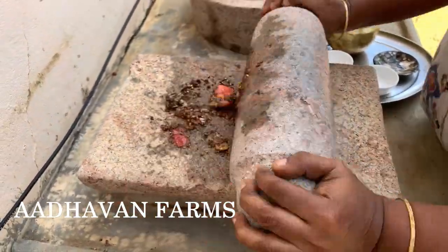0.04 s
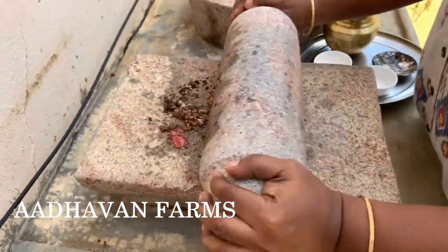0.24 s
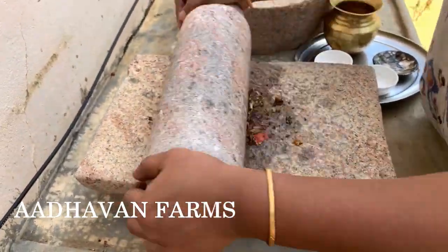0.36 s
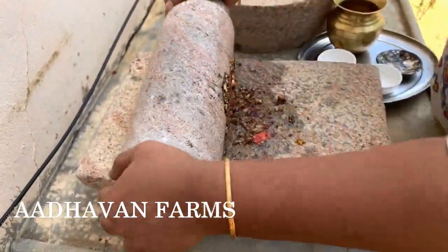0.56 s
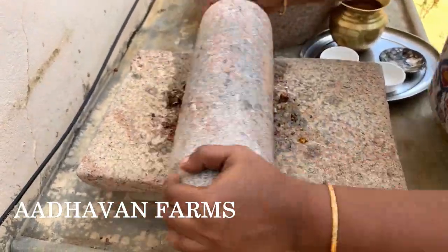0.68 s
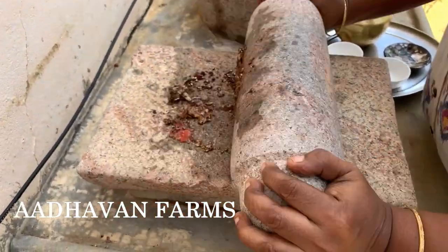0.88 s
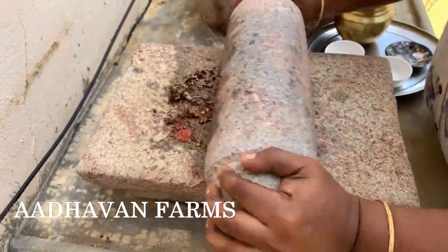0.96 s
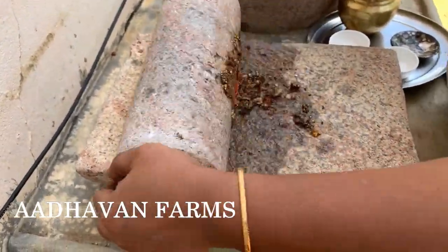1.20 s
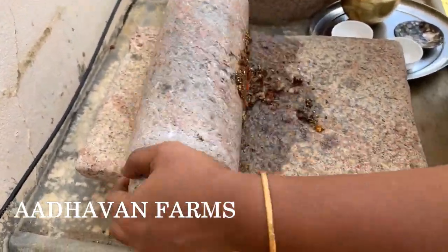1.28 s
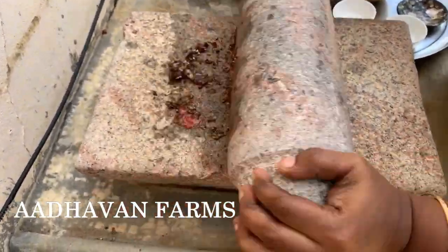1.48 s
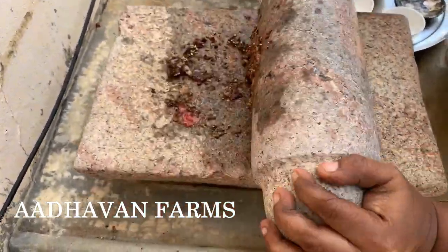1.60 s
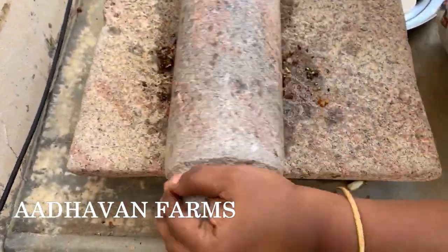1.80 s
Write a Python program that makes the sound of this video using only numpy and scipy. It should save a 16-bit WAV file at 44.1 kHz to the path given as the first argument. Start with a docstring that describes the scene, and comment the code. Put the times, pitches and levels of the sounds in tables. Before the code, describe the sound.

A heavy stone roller rasps to and fro over a stone slab, crushing gritty wet spices

```python
"""A stone roller is pushed to and fro over a stone slab, crushing wet spice paste, close to the ear.
Its strokes are coloured noise, dense with tiny clicks, that swells with the roller's speed.
Seeds burst as short noise flurries with a pitched snap; thin sine squeaks sink in pitch at the turns.
The roller knocks on the slab, twice loudly, as banks of decaying modes; nearby walls answer with noise tails.
A wavering sine hum and dull, wide yard noise lie underneath."""
import sys
import numpy as np
from scipy import signal
from scipy.fft import rfft, irfft
from scipy.io import wavfile

SR = 44100
rng = np.random.default_rng(int(sys.argv[2]) if len(sys.argv) > 2 else 0)


def transcribe(u):
    """Save the signal u as a 16-bit wav file named by the first command-line argument.

    u: samples, shape (n,) or (channels, n), limited to [-1, 1]; the rate is SR.
    q: integer samples, one column per channel.
    """
    v = np.clip(np.atleast_2d(u).T, -1, 1)
    q = np.round(v * 32767).astype(np.int16)
    wavfile.write(sys.argv[1], SR, q)


N = 81585
WALL_S = 0.012  # the walls stay silent this long before they answer

# colour of gritty crushing, for strokes and seeds: (frequency [Hz], relative level per Hz [dB])
GRIT_COLOUR = [(400, -18.5), (900, -20.5), (1550, -2), (2150, -5.5), (2950, 1), (3600, -4.5), (4600, -4.5),
               (7000, -28), (14000, -38)]


def undb(db):
    """Decibels to gain."""
    return 10 ** (np.asarray(db) / 20)


def unit(x):
    """Scale to rms 1."""
    return x / np.sqrt(np.mean(x ** 2))


def at(points, hz):
    """Read a table on a log-frequency axis."""
    table_hz, values = np.array(points, float).T
    return np.interp(np.log(np.maximum(hz, 1)), np.log(table_hz), values)


def colour(x, points):
    """Shape a spectrum, keeping the power of white noise."""
    gain = unit(undb(at(points, np.fft.rfftfreq(2 * N, 1 / SR))))
    return irfft(rfft(x, 2 * N) * gain)[..., :N]


def walk(steps_per_s):
    """Random wander, in straight lines between chance values, with a spread near 1."""
    steps = rng.standard_normal(4096)
    return 1.05 * np.interp(np.arange(N) / SR * steps_per_s, np.arange(len(steps)), steps)


def pan(x, db):
    """Place a sound left (+) or right (-) by a level difference."""
    return x * undb(np.array([[db], [-db]]) / 2)


def echo(x, t60, db, delay):
    """Scattered reflections: a decaying noise tail, different on each side."""
    t = np.arange(N // 4) / SR
    decay = np.exp(-np.log(1000) * t / t60)
    tail = rng.standard_normal((2, len(t))) * decay * (t > delay)
    tail /= np.sqrt(np.sum(tail ** 2, axis=1, keepdims=True))
    return undb(db) * signal.fftconvolve(x, tail, axes=1)[:, :N]


def resonance(hz, width):
    """Frequency response of one band-pass resonance."""
    f = np.maximum(np.fft.rfftfreq(N, 1 / SR), 1)
    return 1 / (1 + 1j * (f / hz - hz / f) * hz / width)


def fractures():
    """Dense tiny clicks of very uneven size over smooth rubbing."""
    grains_per_s, grain_spread_db, smooth_share = 4500, 2.5, 0.46
    size = undb(grain_spread_db * np.minimum(rng.exponential(size=N), 6))
    clicks = (rng.random(N) < grains_per_s / SR) * size * rng.choice([-1, 1], N)
    rubbing = rng.standard_normal(N)
    return unit(unit(clicks) + smooth_share * rubbing)


def spread():
    """Fractures along the line of contact, reaching left and right a little differently."""
    width_db = -8.5
    return fractures() + undb(width_db) * fractures() * np.array([[1], [-1]])


def crumbs():
    """A gain that jumps whenever a small crumb breaks at random and falls back at once."""
    crumbs_per_s, fall_s, largest_db = 97, 0.0013, 0.5
    breaks = (rng.random(N) < crumbs_per_s / SR) * rng.random(N) * undb(largest_db)
    return unit(1 + signal.lfilter([1], [1, -np.exp(-1 / (fall_s * SR))], breaks))


def strokes(t):
    """Levels of hiss, grit and rumble: each stroke swells and fades with the roller's speed, juddering."""
    # strokes of the roller: (start [s], length [s], place of the fastest moment [0-1],
    # hiss level [dB], grit level [dB], slab rumble level [dB]), levels before the judder
    stroke_table = [(-.16, 0.2, 0.94, -58.5, -60, -94), (0.07, 0.33, 0.53, -52, -54, -69),
                    (0.436, 0.27, 0.3, -46.5, -53, -57.5), (0.644, 0.23, 0.12, -51.5, -60.5, -61),
                    (.87, 0.38, 0.12, -52, -56, -65), (1.185, .33, 0.42, -46, -52.5, -60.5),
                    (1.344, 0.52, 0.19, -66, -69.5, -62.5), (1.563, 0.35, 0.41, -49.5, -54, -61)]
    rasp_shape, rumble_shape = 1.505, 0.99  # powers of speed: the slab rumbles even when the roller is slow
    smear_db, smear_from_s = -68.5, 0.089  # wet paste keeps fizzing between strokes
    judder_db, judder_steps_per_s = 2.27, 55.64
    chatter_db, chatter_steps_per_s = 1.02, 345.3
    shapes = np.array([[rasp_shape], [rasp_shape], [rumble_shape]])
    power = np.zeros((3, N))
    for start, length, fastest, *dbs in stroke_table:
        progress = np.interp((t - start) / length, [0, np.clip(fastest, .05, .95), 1], [0, .5, 1])
        speed = np.abs(np.sin(np.pi * progress))
        power += (undb(dbs)[:, None] * speed ** shapes) ** 2
    power[0] += undb(smear_db) ** 2 * (t > smear_from_s)
    unsteady_db = judder_db * walk(judder_steps_per_s) + chatter_db * walk(chatter_steps_per_s)
    return np.sqrt(power) * crumbs() * undb(unsteady_db)


def shifting(x):
    """Each quarter octave of the rasp rises and falls on its own as new grit passes under the stone."""
    patchy_db, patchy_steps_per_s = 3, 35
    # octaves above 1 kHz; everything lower shares the first band
    octave = np.clip(np.log2(np.maximum(np.fft.rfftfreq(N, 1 / SR), 1) / 1000), 0, 4)
    bands = [np.maximum(1 - abs(4 * octave - k), 0) for k in range(17)]
    spectrum = rfft(x)
    return sum(irfft(spectrum * band, N) * undb(patchy_db * walk(patchy_steps_per_s)) for band in bands)


def grinding(t):
    """Rasp and bursting seeds, coloured by the stone's resonances and answered by the walls."""
    # colours of the rubbing and of the slab's rumble: (frequency [Hz], relative level per Hz [dB])
    hiss_colour = [(1500, -25.5), (3500, -6.5), (5200, 1), (6500, -2), (7600, -1.5), (8600, 4),
                   (9500, -3.5), (10300, -9.5), (11200, -4.5), (14500, -3), (16000, -17)]
    slab_colour = [(60, -29), (130, 7.5), (230, 2.5), (320, 3.5), (420, 3.5), (600, -4.5), (1000, -1.5),
                   (2200, -44)]
    # narrow resonances of the stone that the rasp excites: (frequency [Hz], width [Hz], boost [dB])
    stone_rings = [(2847, 23, 6.5), (6340, 110, 9), (6780, 73, 6), (6950, 140, 5.5), (8550, 13, -18),
                   (9930, 120, 13)]
    # phase by which the left side leads: (frequency [Hz], lead [rad])
    rasp_lead = [(900, 0.18), (1400, 0.46), (2200, 2.1), (3100, 0.51), (4500, 3), (7000, 0.23),
                 (10000, 0.27), (15000, 0.84)]
    hiss_pan_db, grit_pan_db, seed_pan_db = -1, -0.75, -4
    near_t60_s, near_db = 0.019, -5.5
    yard_t60_s, yard_echo_db = 0.17, -21.5

    hiss_level, grit_level, slab_level = strokes(t)
    hiss = pan(colour(hiss_level * spread(), hiss_colour), hiss_pan_db)
    grit = pan(colour(grit_level * spread(), GRIT_COLOUR), grit_pan_db)
    rasp = shifting(hiss + grit)
    rasp += pan(seeds(t), seed_pan_db)
    rasp += colour(slab_level * spread(), slab_colour)

    stone = 1 + sum((undb(db) - 1) * resonance(hz, width) for hz, width, db in stone_rings)
    spectrum = rfft(rasp) * stone
    spectrum[1] *= np.exp(-1j * at(rasp_lead, np.fft.rfftfreq(N, 1 / SR)))  # the right side lags
    rasp = irfft(spectrum, N)
    return rasp + echo(rasp, near_t60_s, near_db, 0) + echo(rasp, yard_t60_s, yard_echo_db, WALL_S)


def background(t):
    """A low hum wavering in pitch and level over the dull noise of the yard."""
    # hum before its waver: (time [s], level [dB])
    hum_levels = [(0, -50.5), (.23, -42.5), (.38, -46), (.9, -46.5), (1.25, -46), (1.5, -51), (1.62, -57),
                  (1.8, -52.5)]
    # colour of the yard noise: (frequency [Hz], relative level per Hz [dB])
    yard_colour = [(20, -23), (45, 2), (70, 4.5), (110, -0.5), (220, -25.5), (500, -26), (1500, -31.5),
                   (5000, -32), (16000, -47)]
    hum_hz, hum_pan_db, hum_waver_db = 50, -2.5, 2.5
    yard_db, side_db = -53.5, -1.5  # side is relative to the middle
    turns = np.cumsum(hum_hz * (1 + 0.012 * walk(8.4))) / SR
    hum_db = np.interp(t, *np.array(hum_levels).T) + hum_waver_db * walk(12.6)
    hum = np.sqrt(2) * np.sin(2 * np.pi * turns) * undb(hum_db)
    mid, side = colour(rng.standard_normal((2, N)), yard_colour)
    yard = undb(yard_db) * (mid + undb(side_db) * side * np.array([[1], [-1]]))
    return pan(hum, hum_pan_db) + yard


def seeds(t):
    """Each seed gives way in a flurry of cracks: its husk snaps at its own pitch over a gritty crunch."""
    # bursting seeds: (peak time [s], rise [s], decay [s], snap level [dB], snap pitch [Hz],
    # crunch level [dB]), levels before stone and walls
    seed_table = [(0.11, 0.0078, 0.023, -50.5, 8300, -52.5), (0.181, 0.0033, 0.0024, -64, 9000, -56),
                  (0.479, 0.0084, 0.005, -53, 7100, -51), (0.553, 0.0065, 0.011, -39, 3380, -40),
                  (0.605, 0.0053, 0.0036, -31.5, 6740, -44.5), (0.618, 0.0066, 0.0066, -44, 7400, -45),
                  (0.678, 0.022, 0.017, -54, 2260, -49), (0.6972, 0.00081, 0.001, -30, 7600, -34.5),
                  (0.701, 0.003, 0.01, -48, 11100, -39.5), (0.7685, .001, 0.0015, -47, 6500, -50),
                  (0.901, 0.0045, 0.018, -74, 7100, -63), (.951, .002, 0.0081, -57, 6300, -54.5),
                  (.994, 0.018, 0.017, -47.5, 6700, -45), (1.317, 0.0026, 0.0048, -41.5, 9150, -44.5),
                  (1.346, 0.0059, 0.0068, -43.5, 9500, -47.5), (1.39, 0.0034, 0.0054, -44, 8700, -48),
                  (1.66, 0.0017, 0.0084, -46, 6500, -45.5), (1.701, 0.0024, 0.0078, -47, 6400, -47)]
    snap_q = 3
    cracks, snaps, crunch = spread(), 0, 0
    for peak, rise, decay, snap_db, hz, grit_db in seed_table:
        burst = np.exp(-np.maximum((peak - t) / rise, (t - peak) / decay))
        husk = resonance(hz, hz / snap_q)
        husk = husk / np.sqrt(np.mean(abs(husk) ** 2))
        snaps = snaps + undb(snap_db) * rfft(burst * cracks) * husk
        crunch = crunch + undb(grit_db) * burst
    return irfft(snaps, N) + colour(crunch * spread(), GRIT_COLOUR)


def squeaks(t):
    """Faint sinking squeaks of wet stone as the roller turns back: wobbling sines."""
    # squeaks: (start [s], length [s], pitch midway [Hz], peak level [dB])
    squeak_table = [(0.372, 0.057, 6050, -58.5), (0.435, 0.051, 5850, -56.5), (0.729, 0.062, 5730, -54.5),
                    (0.842, 0.095, 5500, -59), (1.139, 0.095, 7000, -55), (1.5, 0.11, 4970, -66)]
    sag_hz_per_s, wobble = 2200, 0.0076  # wobble as a share of the pitch
    out = np.zeros(N)
    for start, length, hz, db in squeak_table:
        pitch = hz * (1 + wobble * walk(290)) - sag_hz_per_s * (t - start - length / 2)
        swell = np.sin(np.pi * np.clip((t - start) / length, 0, 1))
        out += undb(db) * swell * np.sin(2 * np.pi * np.cumsum(pitch) / SR)
    return out


def knocks(t):
    """The roller drops onto the slab: modes set in late and build over a cycle, so lows bloom last."""
    # knocks: (start [s], level offset [dB], contact cut-off [Hz], place [0 = slab edge .. 1 = middle],
    # share of the left-right phase lead [ratio], echo level [dB])
    knock_table = [(0.405, 4, 1900, 0.11, 0.98, -10.5), (0.7515, -12.5, 1180, 0.35, 0.98, -19),
                   (0.7562, -0.5, 1090, 0.96, 1.02, -15.5)]
    # modes of roller and slab: (frequency [Hz], t60 [s], relative level struck at the edge [dB],
    # relative level struck in the middle [dB])
    mode_table = [(159, 0.074, -23.5, -27.5), (211, 0.035, -18.5, -29), (350.7, 0.28, -33.5, -48),
                  (358, 0.072, -45.5, -13.5), (398.2, 0.047, -23.5, -11), (421, 0.17, -39, -49),
                  (553.6, 0.024, -5, -57.5), (560, 0.46, -46.5, -82), (615, 0.12, -33, -39.5),
                  (690, 0.065, -26.5, -31.5), (944, 0.078, -19, -33.5), (1079, .012, -7, -30),
                  (1304, 0.015, -7, -50), (1730, 0.047, -32.5, -58)]
    # phase by which the left side leads: (frequency [Hz], lead [rad])
    knock_lead = [(120, 0), (200, 2.63), (340, 1.36), (430, 0.76), (600, 0.65), (950, 0.98), (1400, 1.32)]
    late_cycles, build_cycles = 1.3, .9
    cushion_hz, echo_t60_s = 2000, 0.16  # the paste cushions the blow
    cushion = signal.butter(4, cushion_hz, fs=SR, output="sos")
    out = 0
    for start, db, contact_hz, place, lead, echo_db in knock_table:
        blow = np.zeros((2, N))
        for hz, t60, edge_db, middle_db in mode_table:
            age = np.maximum(t - start - late_cycles / hz, 0)
            build = 1 - np.exp(-(age * hz / build_cycles) ** 2)
            ring = build * np.exp(-np.log(1000) * age / t60)
            mode_db = db + edge_db + place * (middle_db - edge_db)
            gain = undb(mode_db) / np.hypot(1, (hz / contact_hz) ** 2)  # soft contact dulls the highs
            phase = lead * at(knock_lead, hz) * np.array([[.5], [-.5]])
            blow += gain * ring * np.sin(2 * np.pi * hz * age + phase)
        blow = signal.sosfilt(cushion, blow + 1e-18)  # the tiny offset keeps the filter off denormals
        out = out + blow + echo(blow, echo_t60_s, echo_db, WALL_S)
    return out


def scene():
    """Grinding, squeaks, knocks and background together."""
    t = np.arange(N) / SR
    return grinding(t) + squeaks(t) + knocks(t) + background(t)


def record(dry):
    """The recorder cuts the top with a steep low-pass."""
    top_hz = 15900
    return signal.sosfilt(signal.ellip(10, .2, 80, top_hz, fs=SR, output="sos"), dry)


dry = scene()
out = record(dry)
transcribe(out)
```